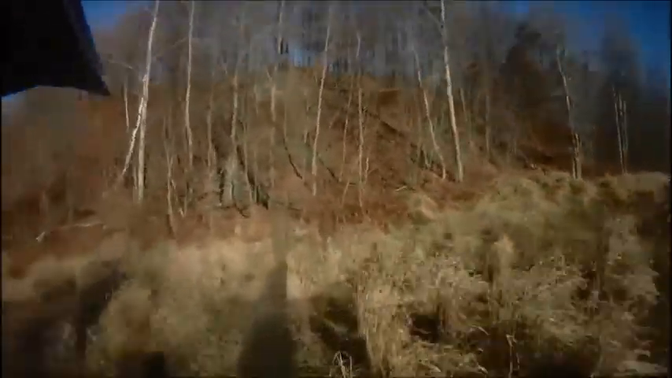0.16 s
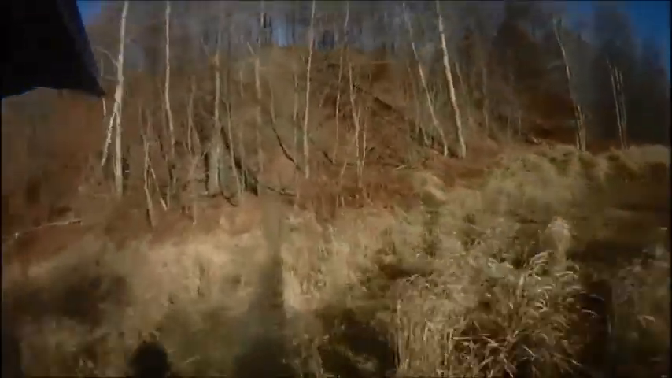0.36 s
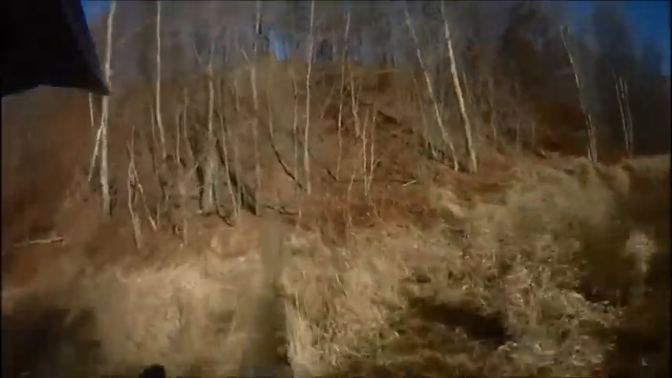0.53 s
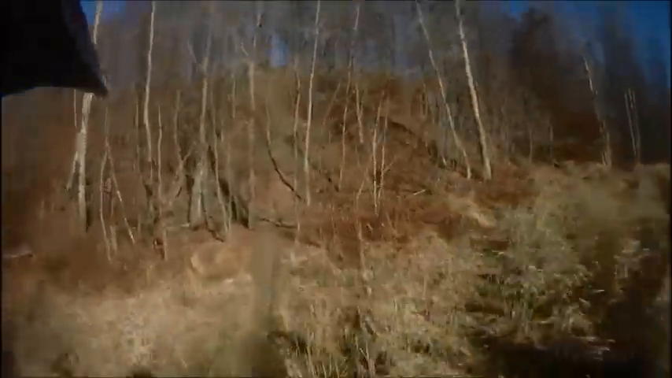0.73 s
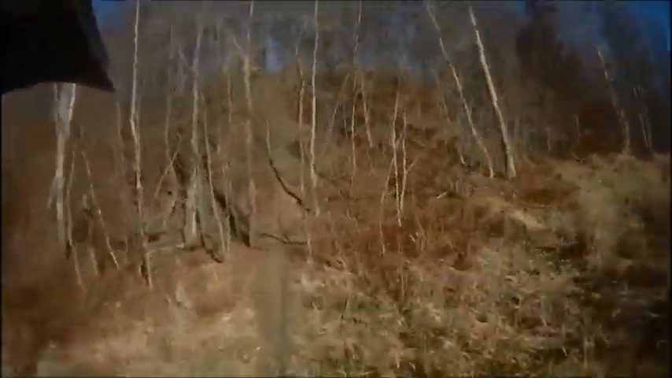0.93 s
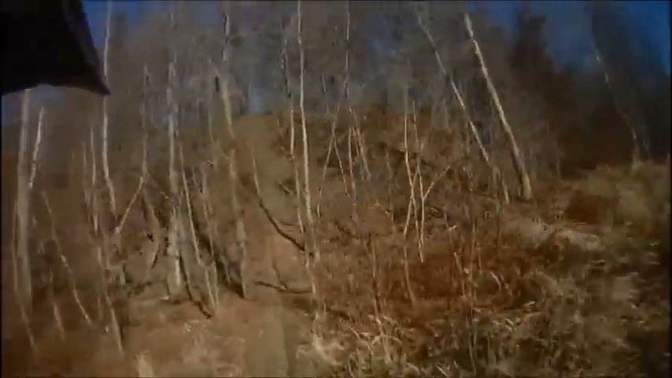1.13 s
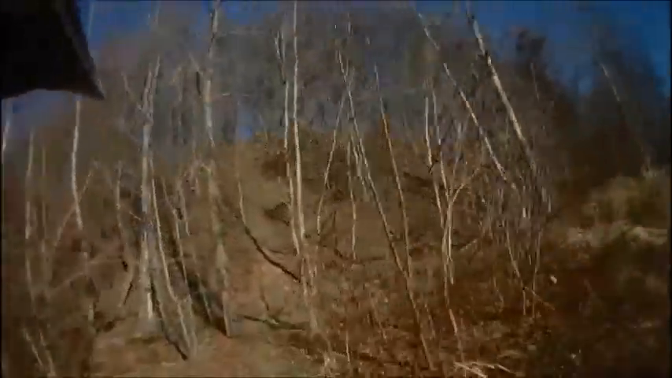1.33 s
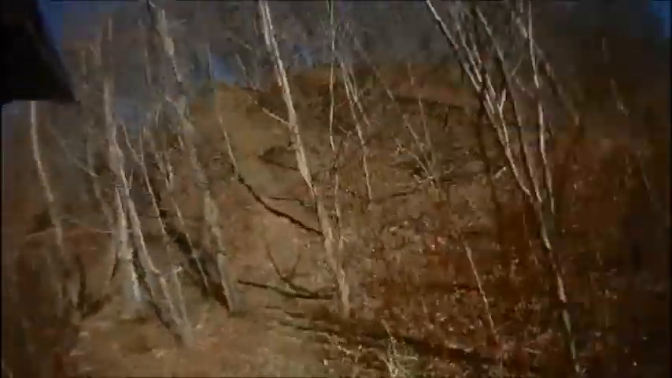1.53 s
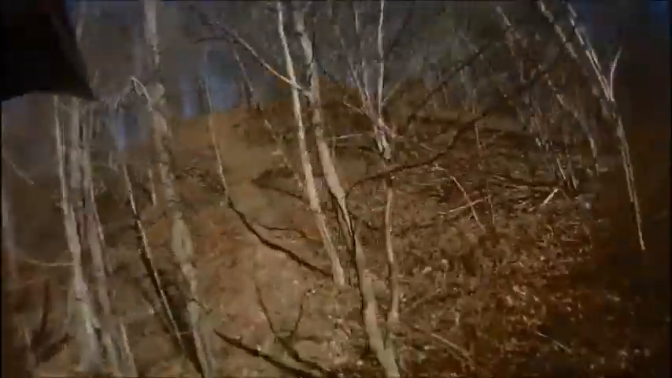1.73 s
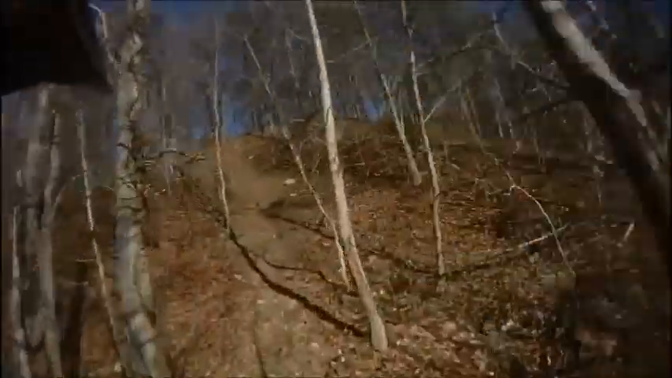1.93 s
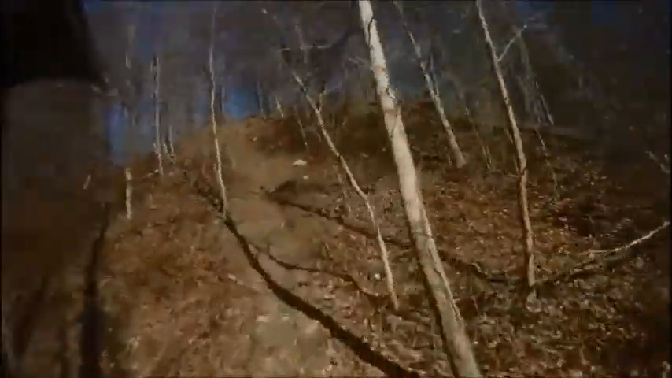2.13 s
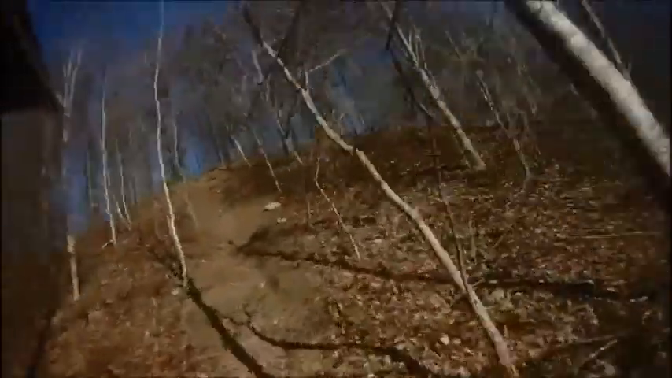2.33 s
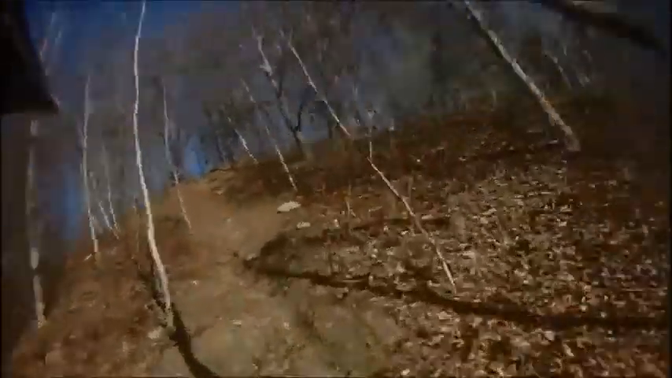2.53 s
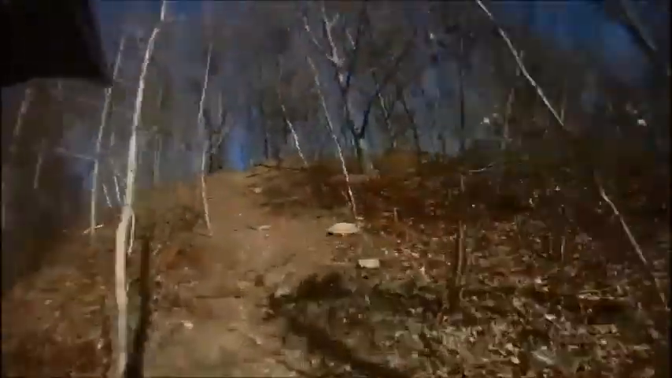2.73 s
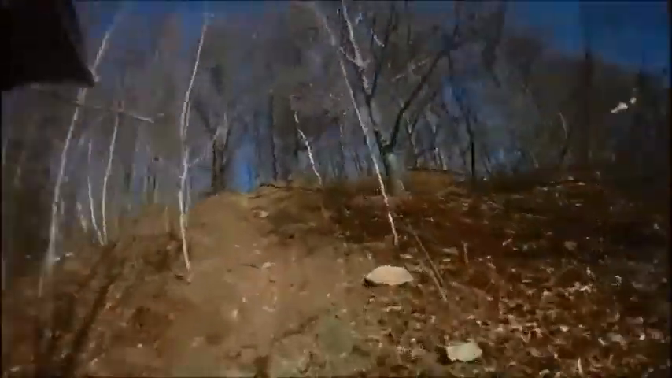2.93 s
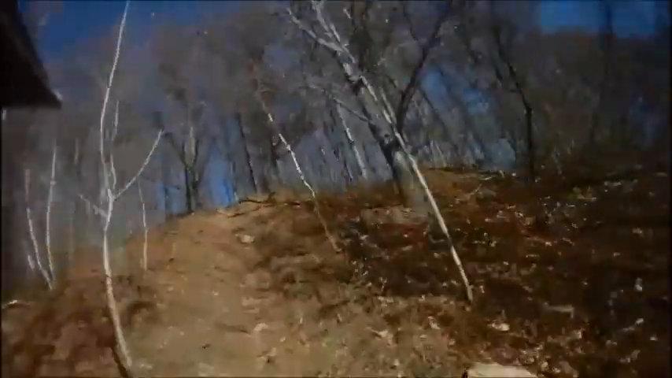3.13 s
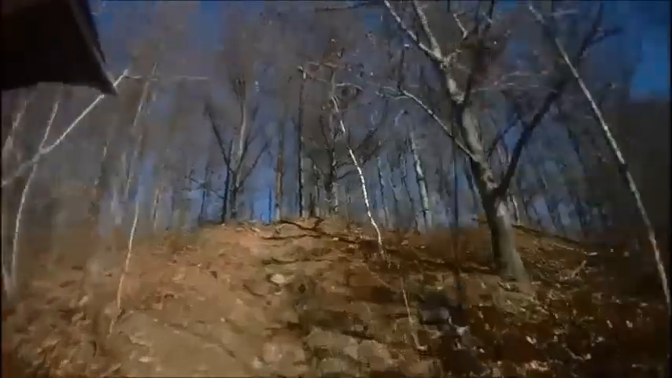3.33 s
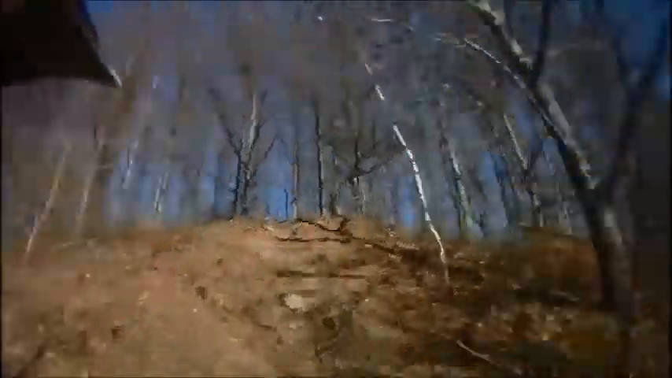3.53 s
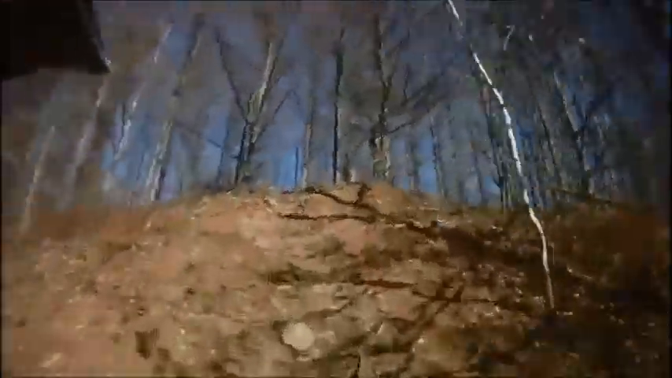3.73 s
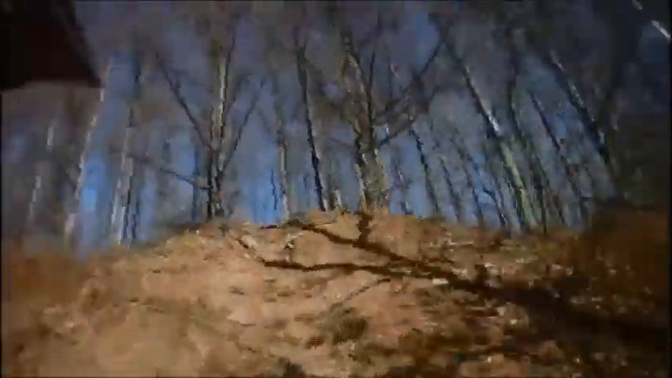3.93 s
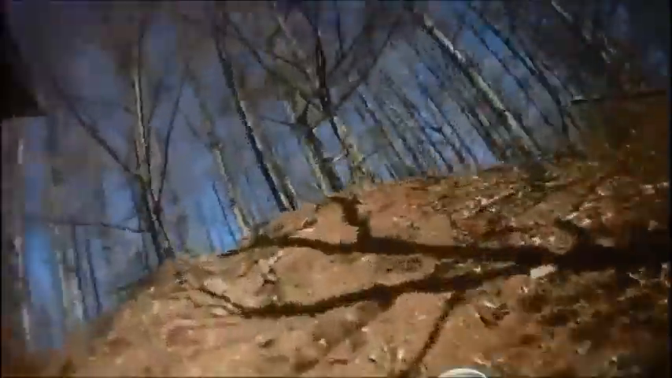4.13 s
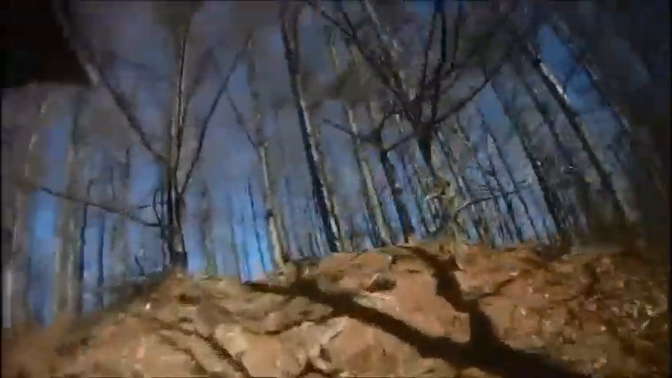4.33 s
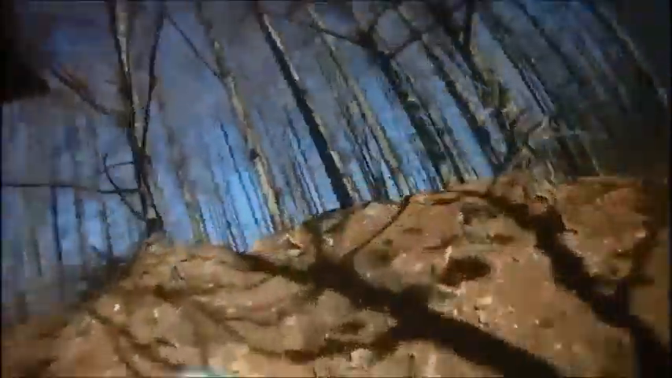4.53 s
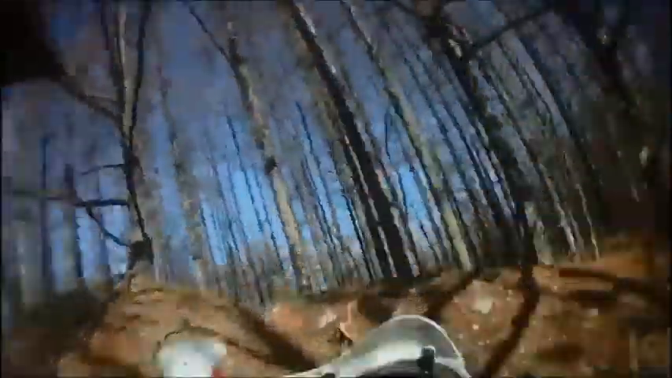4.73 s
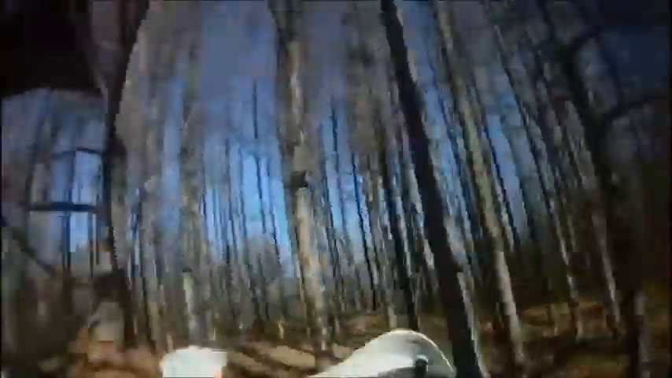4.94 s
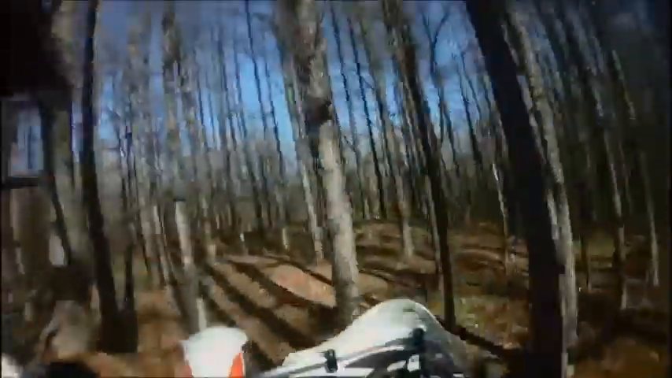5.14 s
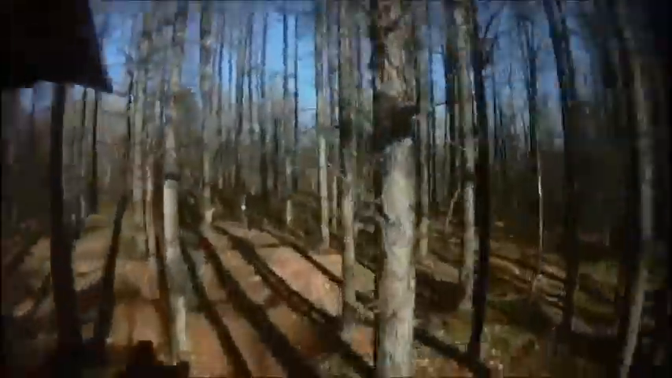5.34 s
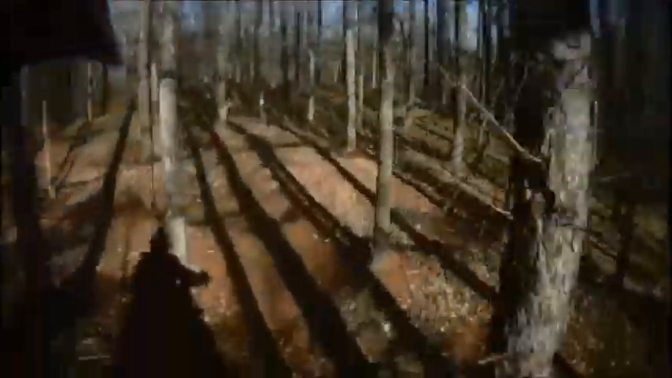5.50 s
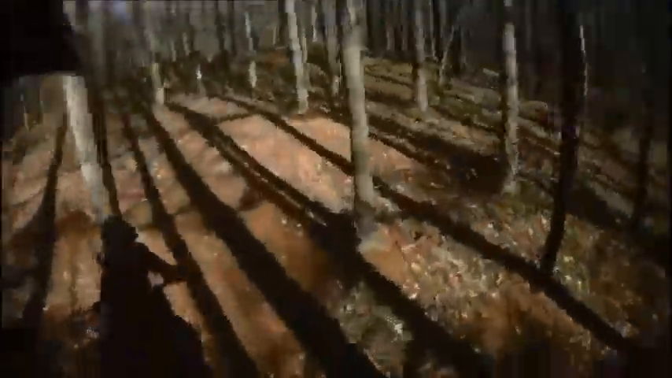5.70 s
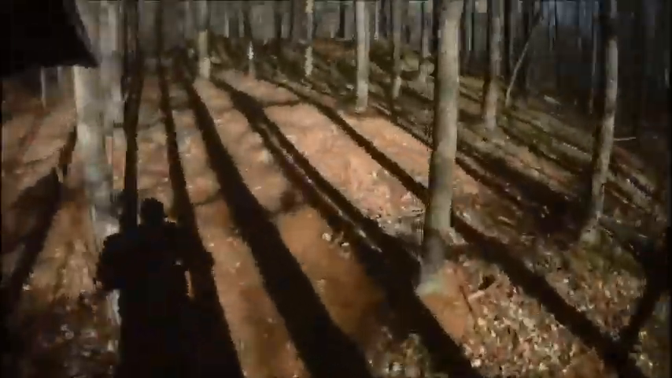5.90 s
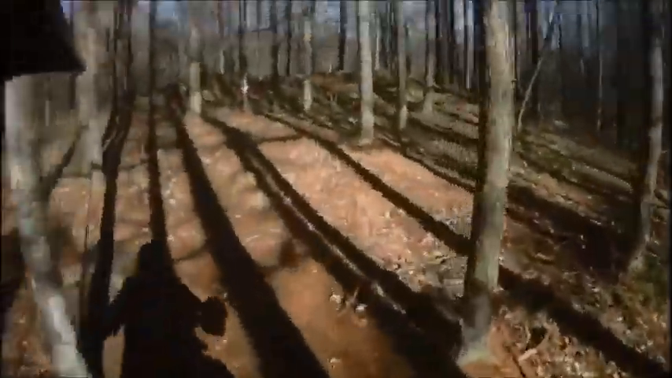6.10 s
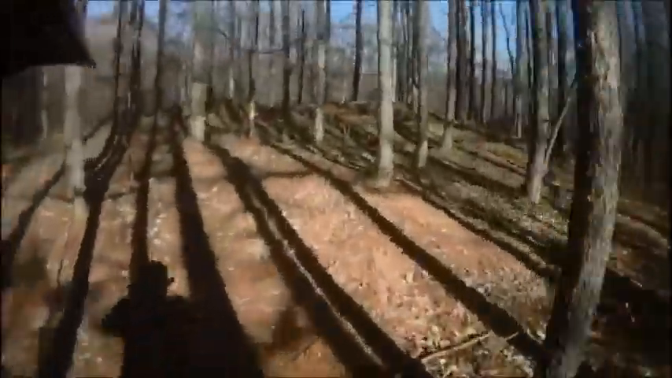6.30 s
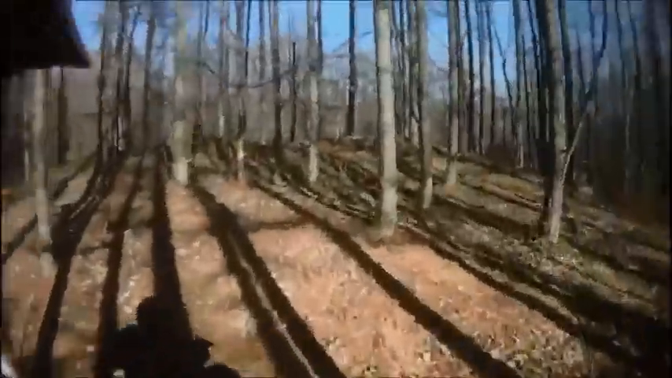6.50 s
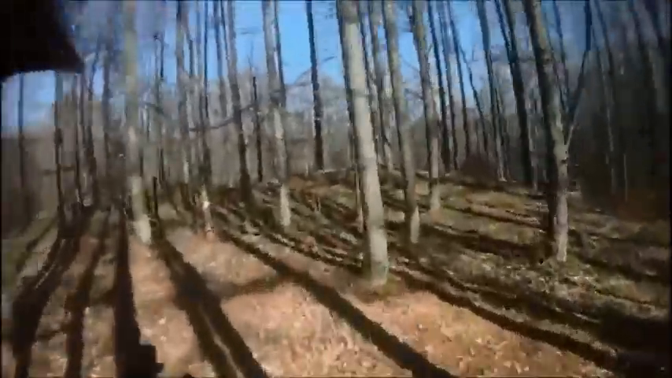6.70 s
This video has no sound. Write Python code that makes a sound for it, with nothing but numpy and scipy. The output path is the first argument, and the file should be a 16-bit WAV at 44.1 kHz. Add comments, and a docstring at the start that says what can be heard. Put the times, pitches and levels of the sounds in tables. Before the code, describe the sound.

A two-stroke dirt bike, heard from a microphone at the rider's helmet, climbs a wooded slope. Its ringing, nasal buzz rises and falls in quick surges, broken by brief stumbles of loose pops, with metallic rattle and low wind. Near five seconds the throttle closes, leaving a soft uneven idle, piston ticks and dry twig snaps, then a slightly firmer putter at the end.

```python
"""Two-stroke dirt bike on a wooded climb

A single-cylinder two-stroke climbs under its rider's helmet microphone. It surges, stumbles into lone
pops, then drops to an uneven idle where twigs snap and the piston ticks. Firing clicks ring the exhaust
pipe and crack at the port; filtered noise makes rattle, clatter and wind; snaps are short noisy rings."""
import sys
import numpy as np
from scipy import signal
from scipy.io import wavfile
from scipy.ndimage import uniform_filter1d

SR = 44100
rng = np.random.default_rng(int(sys.argv[2]) if len(sys.argv) > 2 else 0)


def master_out(mix):
    """Clip the mix to full scale and print it as 16-bit PCM to the path in sys.argv[1]."""
    frames = np.transpose(np.atleast_2d(mix))
    ceiling = np.clip(frames, -1, 1)
    pcm = np.round(ceiling * 32767).astype(np.int16)
    wavfile.write(sys.argv[1], SR, pcm)


def ratio(d):
    """dB to gain"""
    e = np.asarray(d, float) / 20
    return 10 ** e


N = 302522


def evened(x):
    """Scales a signal to rms 1."""
    return x / np.sqrt(np.mean(x ** 2) + 1e-20)


def curves(rows):
    """Interpolates each column of a table over its first, time_s."""
    time_s, *columns = np.transpose(rows)
    return [np.interp(np.arange(N) / SR, time_s, column) for column in columns]


def colour(x, spectrum):
    """Causal minimum-phase filter with the given spectrum, steeply closed outside it; energy 1."""
    point_hz, point_db = np.transpose(spectrum)
    hz = abs(np.fft.fftfreq(8192, 1 / SR))
    gain_db = np.interp(np.log(hz + 1), np.log(point_hz + 1), point_db, left=-90, right=-100)
    log_gain = gain_db * np.log(10) / 20
    taps = np.fft.ifft(np.exp(np.conj(signal.hilbert(log_gain)))).real[:4096]
    return signal.oaconvolve(x, taps / np.linalg.norm(taps))[:N]


def resonate(x, hz, width_hz):
    """One resonance: shifts hz (fixed or moving) to zero, smooths, shifts back."""
    turn = np.exp(2j * np.pi * np.cumsum(hz * np.ones(len(x))) / SR)
    r = np.exp(-np.pi * width_hz / SR)
    return 2 * (turn * signal.lfilter([1 - r], [1, -r], x / turn)).real


def ring(x, modes):
    """Each resonance twice over: a soft start and dark valleys; a unit click gives energy 1."""
    click = np.arange(4096) == 0
    taps = np.zeros(4096)
    for k, (hz, width_hz, db) in enumerate(modes):
        taps += (-1) ** k * ratio(db) * resonate(resonate(click, hz, width_hz), hz, width_hz)
    return signal.oaconvolve(x, taps / np.linalg.norm(taps))[:N]


def clicks(per_s, scatter_db):
    """One click a turn, smaller at higher rates to hold the mean power; sizes scattered."""
    at = np.flatnonzero(np.diff(np.floor(np.cumsum(per_s) / SR)))
    out = np.zeros(N)
    out[at] = np.sqrt(SR / per_s[at]) * ratio((scatter_db * rng.standard_normal(N))[at])
    return out


# engine speed, wavering as the rear wheel grips and slips: time_s, firings_per_s
ENGINE_SPEED = [(0.0, 78.1), (0.19, 82.3), (0.54, 95.2), (0.63, 104.8), (0.72, 104.8), (0.9, 88.8),
                (1.02, 103), (1.05, 101.6), (1.15, 89.5), (1.25, 106.7), (1.36, 119.1), (1.45, 114.3),
                (1.5, 102.9), (1.57, 103.9), (1.68, 108.5), (1.77, 109.3), (1.84, 121.3), (1.96, 120.8),
                (2.01, 117.2), (2.07, 102), (2.11, 104.6), (2.2, 115.9), (2.37, 118.3), (2.46, 109.1),
                (2.5, 114.8), (2.55, 110.7), (2.65, 115.7), (2.8, 131.5), (2.87, 114.9), (2.95, 115),
                (3.03, 112.4), (3.08, 114), (3.14, 105.3), (3.23, 115.5), (3.32, 119.7), (3.4, 136),
                (3.44, 132.4), (3.52, 107.9), (3.56, 107.4), (3.66, 95.2), (3.7, 88.1), (3.77, 93.8),
                (3.85, 104.3), (3.92, 95.4), (3.98, 104), (4.03, 95.6), (4.18, 81.8), (4.31, 92.6),
                (4.39, 103.6), (4.42, 104.5), (4.48, 99.5), (4.5, 94.1), (4.54, 76.7), (4.56, 75.2),
                (4.64, 94.7), (4.67, 89.5), (4.72, 75.1), (4.8, 80.5), (4.84, 79.3), (4.9, 72.1)]
# engine load as relative exhaust level: time_s, exhaust_db
ENGINE_LOAD = [(0.0, -28.5), (0.19, -24.5), (0.27, -19.5), (0.54, -16), (0.63, -16.5), (0.72, -24),
               (0.9, -18), (0.94, -17.5), (1.02, -14.5), (1.05, -27.5), (1.12, -20), (1.2, -11),
               (1.32, -13), (1.45, -21.5), (1.5, -19.5), (1.57, -14.5), (1.68, -18.5), (1.77, -14),
               (1.84, -13.5), (1.96, -21.5), (2.01, -17.5), (2.11, -17.5), (2.2, -13), (2.37, -17),
               (2.55, -16), (2.65, -12.5), (2.8, -22.5), (2.87, -16), (2.95, -17.5), (3.03, -14),
               (3.08, -16), (3.14, -15.5), (3.23, -15.5), (3.34, -21.5), (3.57, -21), (3.63, -17),
               (3.7, -19), (3.77, -15.5), (3.98, -15.5), (4.09, -21), (4.18, -19), (4.31, -12),
               (4.41, -19.5), (4.48, -16), (4.54, -22), (4.6, -12.5), (4.72, -25.5), (4.8, -18),
               (4.85, -27), (4.9, -49)]
# main pipe resonance at full load, drifting with gas heat: time_s, pipe_hz
PIPE_TUNING = [(0.0, 540), (0.25, 470), (0.6, 496), (0.75, 428), (1.2, 480), (1.5, 474), (2.2, 481),
               (2.9, 520.5), (3.4, 480), (3.65, 544), (3.8, 510), (4.05, 524), (4.3, 470), (4.45, 540),
               (4.56, 410), (4.67, 503), (4.9, 418)]
# port crack brightness over the climb: time_s, crack_db (relative)
PORT_CRACK_LEVEL = [(0.0, 19.5), (0.3, 8.5), (0.6, 0.5), (0.8, 3.5), (1.0, 2), (1.2, 5.5), (1.3, -1.5),
                    (1.55, 2.5), (1.8, 1), (2.3, 1), (2.45, -0.5), (2.8, 0), (2.95, -5.5), (3.25, -2.5),
                    (3.6, -5), (3.75, -11), (4.0, -9), (4.1, 5), (4.3, 6), (4.42, -9), (4.5, -3), (4.9, 19)]
# regular firing breaks off: start_s, end_s
STUMBLE_SPANS = [(0.758, 0.915), (1.065, 1.165), (1.994, 2.077), (3.437, 3.597)]
# fixed pipe modes: centre_hz, width_hz, relative_db
PIPE_MODES = [(327, 26, -8), (426.5, 87, 9), (576.4, 196, 9)]
# lowest pipe mode: centre_hz, width_hz, relative_db
BOOM_MODE = [(252.4, 101, 0)]
# upper mode of the pipe note: centre_hz, width_hz, relative_db
UPPER_MODE = [(680.3, 97, 0)]
# gas noise in the pipe: freq_hz, relative_db_per_hz
PIPE_GAS_SPECTRUM = [(71, -48), (120, -15), (171, -21.5), (253, -12), (297, -7), (330, -0.5), (419, -2.5),
                     (454, 0), (1000, -20.5), (1300, -88), (2200, -120)]
# fins, chain, piston: freq_hz, relative_db_per_hz
RATTLE_SPECTRUM = [(710, -51), (1200, 1), (1320, -2.5), (2130, 1), (2480, 4.5), (3790, 0.5), (5130, -9.5),
                   (6300, -10), (7820, -16), (11200, -24), (14700, -27), (15500, -45), (16000, -84)]


def pulling():
    """Steady firings ring the pipe; speed and load set its tuning, the crack and the rattle."""
    full_load_db, powerband_per_s, pipe_hz_per_db = -11, 111.85, 6.5
    boom_db, boom_share, boom_db_per_turn, boom_swell_turns = -25, 0.19, 0.72, 16
    upper_db, upper_db_per_turn = -18.5, -0.16
    crack_db, crack_share, crack_db_per_turn, uneven_db_per_turn = -18, 0.39, 1.0242, .17
    rattle_db, rattle_share, rattle_db_per_turn, stumble_rattle_db = -28.5, 0.067, 0.46, -4
    misfire_db, misfire_scatter_db = -19.5, 7.5  # weak burns in a stumble
    rough, stumble_rough, scatter_db, jitter = .12, .4, .9, .05

    per_s, exhaust_db = curves(ENGINE_SPEED)[0], curves(ENGINE_LOAD)[0]
    eased_db = exhaust_db - full_load_db
    below = np.minimum(per_s - powerband_per_s, 0)
    above = np.clip(per_s - powerband_per_s, 0, boom_swell_turns)
    # the resonance rises as the load eases
    pipe_hz = curves(PIPE_TUNING)[0] - pipe_hz_per_db * np.maximum(eased_db, -14)
    t = np.arange(N) / SR
    running = uniform_filter1d(1. * (t < ENGINE_LOAD[-1][0]), 1500)
    firing = 1 - sum((start_s < t) & (t < end_s) for start_s, end_s in STUMBLE_SPANS)

    wander = uniform_filter1d(rng.standard_normal(N), 400)
    firings = clicks(per_s * (1 + jitter * wander), scatter_db)
    firings *= np.where(firing, 1, ratio(misfire_db + misfire_scatter_db * rng.standard_normal(N)))
    # mostly gas noise in a stumble
    drive = firings + np.where(firing, rough, stumble_rough) * rng.standard_normal(N)

    note = ratio(-1.0) * evened(resonate(resonate(drive, pipe_hz, 138), pipe_hz, 135))
    note += ratio(-6.0) * ring(drive, PIPE_MODES)
    note += ratio(upper_db + upper_db_per_turn * below) * ring(drive, UPPER_MODE)
    note += ratio(-11) * colour(rng.standard_normal(N), PIPE_GAS_SPECTRUM)  # gas rushing between firings

    # the boom follows the load only by a share and swells above the power band
    boom_level_db = boom_db + boom_share * eased_db + boom_db_per_turn * above
    boom = ratio(boom_level_db) * ring(drive, BOOM_MODE)

    # below the power band the crack fades quickly and differs from turn to turn
    uneven_db = uneven_db_per_turn * below * rng.uniform(-1.97, 2.0, N)
    crack_level_db = crack_db + curves(PORT_CRACK_LEVEL)[0] + crack_share * eased_db + crack_db_per_turn * below
    crack = ratio(crack_level_db) * blast(firings * ratio(uneven_db))

    # near-steady metallic rattle, louder with speed and load
    near_steady = 1.83 + 0.033 * np.cos(2 * np.pi * np.cumsum(per_s) / SR - 1.5)
    rattle = colour(near_steady * rng.standard_normal(N), RATTLE_SPECTRUM)
    rattle_level_db = rattle_db + rattle_share * eased_db + rattle_db_per_turn * below
    rattle *= ratio(rattle_level_db + stumble_rattle_db * (1 - firing))

    exhaust = silenced(ratio(exhaust_db) * note + boom)
    return running * (exhaust + crack + rattle) + spitting(np.flatnonzero(firings))


def silenced(note):
    """The silencer stops the pipe note steeply above its upper mode."""
    return signal.sosfilt(signal.cheby2(8, 40, 960, fs=SR, output="sos"), note)


# upper pipe modes rung by the port: centre_hz, width_hz, relative_db
SNARL_MODES = [(1023, 240, 6), (1340, 130, -1.5), (1517.2, 185, 5), (1800, 210, -4), (2300, 540, 3.5),
               (2980, 570, -4), (3730, 880, 0), (4570, 190, -4), (6260, 530, -10), (8360, 190, -6),
               (10950, 490, -17)]
# port gas hiss: freq_hz, relative_db_per_hz
CRACK_SPECTRUM = [(530, -3), (900, 12), (1030, -3), (1220, 1.5), (1880, -9), (2270, -13), (2730, -33),
                  (3860, 0), (4980, -12.5), (6330, -6), (7680, -11.5), (8450, -11), (14700, -29),
                  (15400, -12), (16000, -55)]


def blast(firings):
    """The port opens: a sharp front rings the upper modes alike each time; a short puff of gas hisses."""
    sharp, decay_s, late_samples = .95, .0016, 60
    puff = np.exp(-np.arange(1500) / SR / decay_s)
    gate = signal.oaconvolve(firings, puff / np.linalg.norm(puff))[:N]
    hiss = colour(gate * rng.standard_normal(N) - .5 * firings, CRACK_SPECTRUM)
    snarl = ring(firings, SNARL_MODES)
    return np.roll(sharp * snarl + np.sqrt(1 - sharp ** 2) * hiss, late_samples)


# harder cracks under light throttle: time_s, relative_db
SPIT_CRACKS = [(0.381, -23), (0.4359, -16), (0.4579, -13), (0.53, -17), (1.6194, -11), (3.6426, -11),
               (3.7738, -12), (3.915, -11), (4.0038, -6), (4.27, -23), (4.29, -23), (4.3216, -17),
               (4.345, -19), (4.4692, -28), (4.5126, -19), (4.5905, -16), (4.6907, -16)]


def spitting(firing_at):
    """A rich charge now and then cracks harder at the nearest firing."""
    time_s, level_db = np.transpose(SPIT_CRACKS)
    nearest = abs(firing_at - time_s[:, None] * SR).argmin(1)
    front = np.zeros(N)
    front[firing_at[nearest]] = ratio(level_db + 6.0)
    return blast(front)


# lone firings: time_s, relative_db, crack_db (relative to the firing)
LONE_POPS = [(0.787, -4.5, -18), (0.828, -5, -16.5), (0.862, -7, -21), (0.872, -8, -17.5),
             (0.894, -14.5, -12), (1.169, -9.5, -14.5), (1.179, -10, -14), (2.017, -12, -13),
             (2.024, -8, -7), (2.033, -14, 1), (2.061, -11, -5.5), (2.072, -6, -6.5), (3.444, -8, -32),
             (3.455, -11.5, -6), (3.463, -17, -10), (3.489, -24, -25), (3.513, -9, -12), (3.522, -9, -7.5),
             (3.531, -8, -14), (3.561, -7.5, -9), (3.571, -10.5, -9), (3.588, -10, -14), (4.938, -22, -12),
             (5.029, -21, -14), (5.127, -22, -31), (5.367, -23, -20), (5.644, -22.5, -24),
             (5.796, -23.5, -18), (6.143, -22.5, -20), (6.351, -24.5, -28), (6.506, -26, -35),
             (6.529, -28, -23), (6.558, -24, -28), (6.578, -14.5, -23.5), (6.687, -12.5, -37),
             (6.744, -13.5, -40), (6.84, -19.5, -23)]


def popping():
    """Lone firings through the same pipe and port; the idle catches with a run of weak burns."""
    catch_s, catch_period_s, catch_jitter_s, catch_turns = 6.604, .0272, .0015, 9
    catch_db, catch_scatter_db, catch_crack_db = -22, 2.0, -25
    chance = rng.standard_normal((catch_turns, 2))
    catch = [catch_s + catch_period_s * np.arange(catch_turns) + catch_jitter_s * chance[:, 0],
             catch_db + catch_scatter_db * chance[:, 1],
             np.full(catch_turns, catch_crack_db)]
    time_s, level_db, crack_db = np.hstack([catch, np.transpose(LONE_POPS)])
    at = np.round(time_s * SR).astype(int)
    push, front = np.zeros((2, N))
    push[at] = ratio(level_db + 13.5)
    front[at] = ratio(level_db + crack_db + 21)
    note = ring(push, PIPE_MODES)
    note += ratio(-3.0) * ring(push, BOOM_MODE)
    note += ratio(-17.0) * ring(push, UPPER_MODE)
    return silenced(note) + blast(front)


# coasting and idle: time_s, turns_per_s, rumble_db
IDLE_COURSE = [(4.85, 50, -34.5), (5.01, 42, -35), (5.5, 30.4, -38.5), (5.92, 40, -42), (6.19, 49, -42),
               (6.5, 30, -44), (6.75, 38, -36.5), (6.86, 36, -35.5)]
# piston tick modes: centre_hz, width_hz, relative_db
PISTON_MODES = [(2920, 130, 1), (2400, 210, -31), (3780, 350, 11), (6300, 600, -11)]
# mechanical clatter: freq_hz, relative_db_per_hz
CLATTER_SPECTRUM = [(590, -23), (1000, -15), (1230, -1.5), (1890, -4.5), (2780, 6), (3080, -1.5),
                    (4020, -0.5), (5310, -11.5), (6780, -7), (9830, -24.5), (14600, -25), (15300, -26),
                    (16000, -53)]


def idling():
    """Unburnt turns pump the pipe unevenly; the piston ticks once a turn over the clatter."""
    start_db, fade_db_per_s, rest_db, tick_db = -48, -8.5, -56.5, -16.5
    throb_decay_s, loose_per_s = 0.031, 500
    per_s, rumble_db = curves(IDLE_COURSE)
    since_s = np.arange(N) / SR - IDLE_COURSE[0][0]
    clatter_db = np.maximum(start_db + fade_db_per_s * np.maximum(since_s, 0), rest_db)

    throb = signal.oaconvolve(clicks(per_s, 4.1), np.exp(-np.arange(3000) / SR / throb_decay_s))[:N]
    rumble = colour((2.4 + evened(throb)) * rng.standard_normal(N), PIPE_GAS_SPECTRUM)

    ticks = ring(np.roll(clicks(per_s, 1.9), -300), PISTON_MODES)
    loose = ratio(1.2 * np.minimum(rng.exponential(1, N), 4)) * (rng.random(N) < loose_per_s / SR)
    clatter = colour(rng.standard_normal(N) + .5 * evened(loose), CLATTER_SPECTRUM)
    clatter *= ratio(3.3 * evened(uniform_filter1d(rng.standard_normal(N), 700)))  # level wavers
    clatter += ratio(tick_db) * ticks

    coasting = uniform_filter1d(1. * (since_s > 0), 1500)
    return coasting * (ratio(rumble_db) * evened(rumble) + ratio(clatter_db) * clatter)


# twigs and debris on helmet and frame: time_s, ring_db (relative), ring_hz, tick_db (relative)
TWIG_SNAPS = [(4.9154, -52, 2690, -48), (4.9382, -30.5, 5610, -60), (4.9617, -15.5, 2910, -53),
              (4.973, -19, 2800, -62), (5.02, -27, 2300, -40), (5.0667, -36, 2560, -39),
              (5.2636, -29, 5860, -46), (5.2807, -15.5, 2640, -49), (5.315, -41, 11200, -21),
              (5.345, -40, 2760, -33), (5.4111, -50, 2620, -41), (5.4893, -47, 2340, -24),
              (5.5094, -22, 7550, -15), (5.5566, -28, 5750, -38), (5.5706, -20, 5000, -40),
              (5.5795, -35, 7900, -26), (5.6424, -35, 5090, -56), (5.6979, -20, 3330, -43),
              (5.707, -28, 1400, -20), (5.8814, -33, 4220, -59), (5.9056, -24, 4900, -55),
              (5.9154, -33, 4970, -55), (6.019, -34, 2400, -65), (6.7338, -36, 2390, -55)]


def snapping():
    """Each snap is a broad tick and a noisy ring near its own pitch, led in and followed by a rustle."""
    litter_from_s, litter_to_s, litter_count = 4.92, 5.95, 30  # small extra snaps
    litter_db, litter_tick_db = -40, -52
    lead_s, ring_t60_s, tick_t60_s, rise_s = .004, .011, .0021, .000076
    rustle_fall_s, rustle_rise_s = 0.14, 0.0052  # per 60 dB

    when, size, pitch, edge = rng.random((litter_count, 4)).T
    litter = np.transpose([litter_from_s + (litter_to_s - litter_from_s) * when ** 1.1,
                           litter_db - 8 * size,
                           2400 * 2.5 ** (pitch ** 2),
                           litter_tick_db - 12 * edge])
    snaps = np.vstack([TWIG_SNAPS, litter])

    out, t = np.zeros(N + 3000), np.arange(3000) / SR - lead_s
    bright = signal.butter(2, [5000, 14000], "band", fs=SR)
    for (time_s, ring_db, hz, tick_db), hiss in zip(snaps, rng.standard_normal((len(snaps), 3000))):
        tone = np.sin(2 * np.pi * hz * t) + 1.38 * evened(resonate(hiss, hz, 0.15 * hz))
        tone *= np.tanh(t / rise_s) * ratio(ring_db - 5 - 60 * t / ring_t60_s)
        tick = signal.lfilter(*bright, hiss) * ratio(tick_db + 5 - 60 * t / tick_t60_s)
        rustle_db = ring_db - 29 - 60 * np.maximum(t / rustle_fall_s, -t / rustle_rise_s)
        rustle = evened(resonate(hiss[::-1], hz, hz)) * ratio(rustle_db)
        out[round((time_s - lead_s) * SR):][:3000] += (t > 0) * (tone + tick) + rustle
    return out[:N]


# wind buffeting: freq_hz, relative_db_per_hz
WIND_SPECTRUM = [(12, -39), (20, -21.5), (96, -5.5), (140, -7), (200, -3.5), (260, -43), (440, -120)]
# wind course: time_s, level_db (before gusts)
WIND_LEVEL = [(0.0, -39.5), (1.0, -34.5), (1.3, -43), (1.6, -35.5), (2.7, -34), (3.6, -37.5), (4.7, -41.5),
              (5.1, -46), (6.1, -57.5), (6.86, -49)]


def wind():
    """Lumpy buffeting at the microphone, in gusts, easing as the bike slows."""
    lumps = evened(uniform_filter1d(rng.standard_normal(N), 2500))
    gusts = evened(uniform_filter1d(uniform_filter1d(rng.standard_normal(N), 8000), 8000))
    level_db = curves(WIND_LEVEL)[0] + 0.44 * lumps + 2.0 * gusts
    return ratio(level_db) * colour(rng.standard_normal(N), WIND_SPECTRUM)


def scene():
    """Sums engine, snaps and wind into one channel."""
    return (pulling() + popping() + idling() + snapping() + wind())[None]


def low_pass(x):
    """Removes everything above the highest recorded frequency."""
    return signal.sosfilt(signal.butter(12, 16510, fs=SR, output="sos"), x)


def record(dry):
    """The small microphone loses the topmost treble and rounds off the loudest fronts."""
    dull = signal.oaconvolve(dry, signal.firwin(255, 15300, fs=SR)[None], "same")
    mix = 0.84 * np.tanh(dull / 0.93)
    return low_pass(mix)


dry = scene()
out = record(dry)
master_out(out)
```